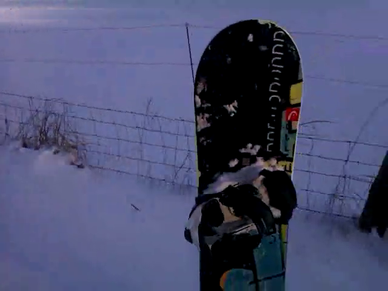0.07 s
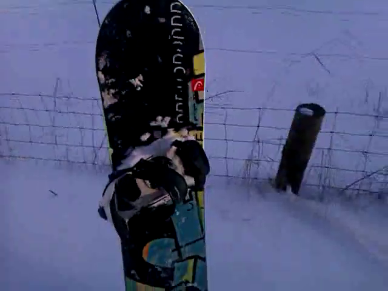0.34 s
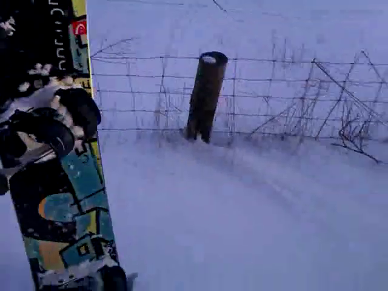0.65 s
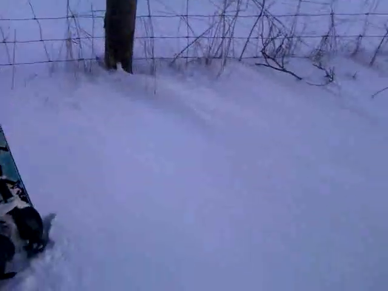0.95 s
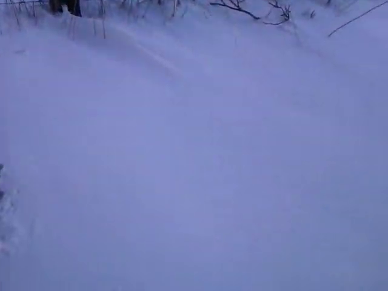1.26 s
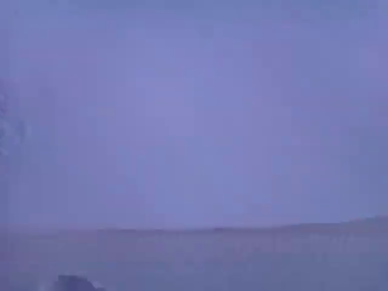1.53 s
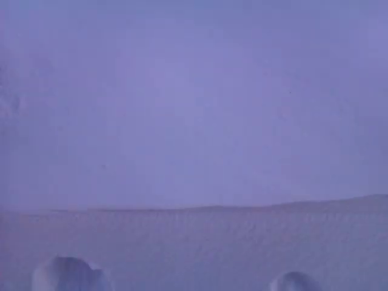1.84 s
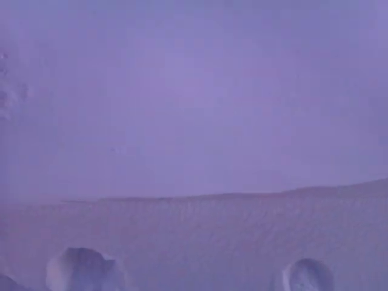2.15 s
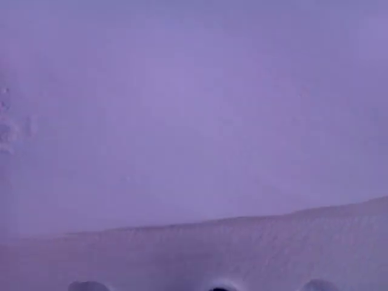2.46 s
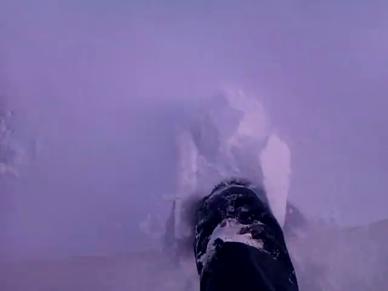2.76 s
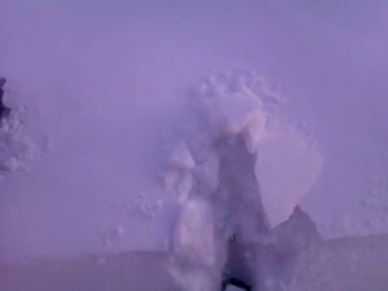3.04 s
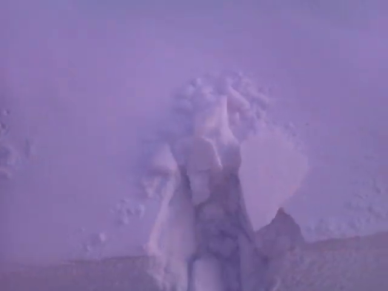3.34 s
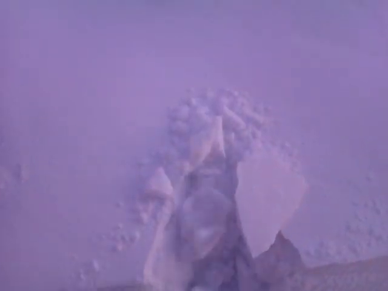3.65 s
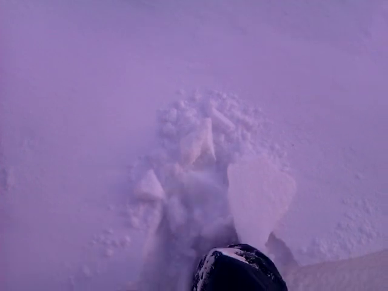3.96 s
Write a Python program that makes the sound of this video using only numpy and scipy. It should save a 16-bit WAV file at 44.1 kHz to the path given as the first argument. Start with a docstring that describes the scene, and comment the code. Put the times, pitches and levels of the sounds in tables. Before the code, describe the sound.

Soft, close crunching of a boot in snow starts about halfway, after rustling clothes, small gear ticks and low wind bumps outdoors. The wind then builds, and one fluttering gust briefly overloads the microphone.

```python
"""First you hear winter clothes rustling over a faint hiss, and low bumps of air on the microphone.
The fabric slides in many tiny slips, and clothing and gear give a few small ticks.
From about two seconds in, a boot pushes through soft snow close by: clumps crumble, powder swishes.
Near the end, one hard, fluttering gust briefly overloads the microphone."""
import sys
import numpy as np
from scipy import signal
from scipy.fft import rfft, irfft
from scipy.io import wavfile
from scipy.ndimage import uniform_filter1d

SR = 44100
rng = np.random.default_rng(int(sys.argv[2]) if len(sys.argv) > 2 else 0)


def materialize(psi):
    """Save the field psi as 16-bit PCM at rate SR to the path in sys.argv[1].

    A 1-D psi becomes a single channel; in a 2-D psi each row is a channel.
    """
    bounded = np.clip(np.atleast_2d(psi).T, -1, 1)
    quanta = np.round(bounded * 32767).astype(np.int16)
    wavfile.write(sys.argv[1], SR, quanta)


N = 176400
T = np.arange(N) / SR

# How loud the clothes rustle: time_s, level_db
RUSTLE_LEVEL = [(0, -61.5), (.33, -56.5), (.46, -50), (.72, -48), (.88, -52.5), (1.4, -57), (1.62, -52.5),
                (2.1, -59), (2.5, -52), (2.86, -54), (2.97, -48.5), (3.08, -48.5), (3.24, -43.5),
                (3.34, -49), (3.53, -48.5), (3.66, -50.5), (3.75, -45.5), (3.88, -42), (4, -44.5)]
# Tone of the sliding fabric: pitch_hz, level_db
CLOTH_TONE = [(200, -4.5), (900, -1.5), (1500, -2), (2000, 1), (2700, -6), (3500, -1.5), (4400, -8.5),
              (5700, 1.5), (6500, -0.5), (7800, -19), (10000, -33.5), (16000, -59.5)]
# Tone of the background hiss: pitch_hz, level_db
HISS_TONE = [(60, -17), (100, -4), (300, 0), (500, -2), (1000, -4), (2100, -8.5), (2800, -10), (4400, -14),
             (5900, -12), (8000, -15), (12000, -20.5), (16000, -20), (17500, -25)]
# How hard the air hits the microphone: time_s, level_db
WIND_LEVEL = [(0, -52), (.09, -55), (.16, -40.5), (.2, -36), (.27, -36.5), (.38, -39), (.47, -31.5),
              (.55, -39.5), (.6, -32), (.66, -39.5), (.71, -27), (.785, -28.5), (.87, -49), (1.0, -49),
              (1.15, -60), (1.37, -48.5), (1.58, -53), (1.72, -70), (2.12, -68), (2.4, -53), (2.72, -42.5),
              (2.86, -47.5), (3.04, -40.5), (3.08, -28.5), (3.13, -26), (3.17, -33.5), (3.21, -24.5),
              (3.26, -34), (3.325, -23.5), (3.36, -41.5), (3.44, -43), (3.48, -30.5), (3.54, -35.5),
              (3.58, -21.5), (3.68, -25), (3.78, -28), (3.86, -23), (3.92, -27.5), (4, -21)]
# How strong fast swirls of air are next to slow ones: time_s, balance_db
FAST_SWIRL_BALANCE = [(0, 5), (.25, -12), (.45, -0.5), (.6, -6.5), (.7, 3), (.8, 6), (.9, -11), (1.6, -27),
                      (2.8, -10.5), (3.1, 3.5), (3.3, 9), (3.45, 2.5), (3.75, -0.5), (4, -2)]
# Tones of the slow, the fast and the deepest swirls: pitch_hz, level_db
SLOW_SWIRL_TONE = [(20, -24), (45, 5), (80, 4.5), (130, -2), (220, -16.5), (400, -23.5), (900, -77)]
FAST_SWIRL_TONE = [(30, -30), (90, -0.5), (160, 5.5), (260, -4), (380, -11), (560, -23.5), (900, -30),
                   (2000, -108)]
DEEP_SWIRL_TONE = [(6, -11), (18, 12.5), (40, 14.5), (62, 13), (90, -19), (200, -67)]
# Single bumps of air: middle_s, peak_db, pitch_hz
AIR_BUMPS = [(0.115, -32.5, 118), (0.353, -31.5, 197), (0.591, -20, 93), (0.696, -18, 144),
             (.758, -19, 176), (.785, -13.5, 151), (1.338, -34.5, 79), (1.362, -35, 153),
             (1.787, -37.5, 228), (2.21, -37.5, 157), (2.995, -17, 120), (3.214, -18.5, 175),
             (3.237, -12, 177), (3.375, -26, 152), (3.424, -26, 350), (3.572, -20, 112), (3.864, -15, 200),
             (3.977, -14.5, 68.4)]
# Ticks of clothing and gear: start_s, peak_db, pitch_hz, fade_s
GEAR_TICKS = [(.703, -23, 5200, .0014), (1.61, -37, 3500, .0015), (1.785, -32, 2600, .0025),
              (2.139, -34, 1500, .0005), (2.506, -35, 1700, .001), (3.423, -26, 1100, .003),
              (3.915, -19, 2300, .0002)]
# Pushes of the boot through snow: start_s, length_s, level_db, powder_db (added to level_db)
BOOT_PUSHES = [(2.189, 0.058, -43, -21), (2.251, 0.24, -47, -11), (2.393, 0.071, -58, 9.5),
               (2.536, 0.11, -46, 0.5), (2.64, 0.096, -47.5, 4.5), (3.008, 0.027, -48.5, 4),
               (3.517, 0.047, -56, 5), (3.7, 0.073, -48, 3.5), (3.773, 0.092, -50, 3.5)]
# Tones of breaking clumps and of loose powder: pitch_hz, level_db
CRUNCH_TONE = [(100, -18), (300, 0.5), (800, -0.5), (2000, -1), (2700, -8.5), (3500, -3.5), (4300, -11),
               (5800, -2), (8000, -23.5), (16000, -26.5)]
POWDER_TONE = [(800, -64), (2500, -6.5), (3500, -8), (4300, -16), (5900, -2), (7300, -10.5), (9000, -14.5),
               (10500, -22.5), (16000, -26)]
# Blows that make up the hard gust: peak_s, level_db, rise_s, fall_s, pitch_hz, rasp_db (added to level_db)
GUST_BLOWS = [(3.600, -14, 0.0046, 0.0036, 250, -14), (3.6146, -3, 0.0083, 0.0064, 238, -7.5),
              (3.635, -13.5, 0.0036, 0.0055, 230, -7), (3.645, -14, 0.0015, 0.0036, 242, -8.5),
              (3.651, -16.5, 0.0012, 0.0031, 258, 1.5)]
# Tone of the gust's rough rasp: pitch_hz, level_db
RASP_TONE = [(100, -18), (330, -33), (470, 7.5), (700, 1), (970, -6.5), (1240, -14.5), (1510, -12.5),
             (1750, -27.5), (2400, -31.5), (3200, -50), (4000, -55), (8000, -91)]


def gain(db):
    """Turns decibels into a number to multiply by."""
    return 10 ** (np.asarray(db) / 20)


def normalise(x):
    """Scales x to an average strength (rms) of 1."""
    return x / np.sqrt(np.mean(x ** 2) + 1e-20)


def curve(points):
    """Joins (time_s, value) points with straight lines."""
    return np.interp(T, *np.transpose(points))


def with_tone(x, tone):
    """Shapes the lows and highs of x by a tone table, at strength 1."""
    hz, db = np.transpose(tone)
    freqs = np.fft.rfftfreq(len(x), 1 / SR)
    gains = gain(np.interp(np.log(freqs + 1), np.log(hz), db))
    return normalise(irfft(rfft(x) * gains, len(x)))


def drift(rate_hz):
    """A smooth random wobble, at strength 1."""
    freqs = np.fft.rfftfreq(N, 1 / SR)
    return normalise(irfft(rfft(rng.standard_normal(N)) * np.exp(-(freqs / rate_hz) ** 2), N))


def grains(per_s, spread_db):
    """Tiny random clicks, a few much louder than the rest."""
    size = gain(spread_db * np.minimum(rng.exponential(1, N), 5))
    return rng.standard_normal(N) * size * (rng.random(N) < per_s / SR)


def swirls(tone, steadiness):
    """The noise of swirling air; steadiness, from 0 to 1, evens out its loudness."""
    noise = with_tone(rng.standard_normal(N), tone)
    power = uniform_filter1d(uniform_filter1d(noise ** 2, size=2200), size=2200)
    return normalise(noise / (power + 1e-6) ** (steadiness / 2))


def clothes():
    """Fabric slides in many uneven little slips."""
    slips = with_tone(grains(per_s=12000, spread_db=1.33), CLOTH_TONE)
    return gain(curve(RUSTLE_LEVEL) + 0.93 * drift(rate_hz=28)) * slips


def hiss(level_db=-52):
    """A faint background hiss that wavers slightly."""
    return gain(level_db + 1.2 * drift(rate_hz=10)) * with_tone(rng.standard_normal(N), HISS_TONE)


def wind():
    """Slow and fast swirls of air brush the microphone, over a deep rumble."""
    wind_db, fast_gain = curve(WIND_LEVEL), gain(curve(FAST_SWIRL_BALANCE))
    slow = swirls(SLOW_SWIRL_TONE, steadiness=0.28)
    fast = swirls(FAST_SWIRL_TONE, steadiness=1.0)
    blend = (slow + fast_gain * fast) / np.sqrt(1 + fast_gain ** 2)
    rumble_db = -22 + 0.55 * wind_db  # rises and falls less than the wind does
    return gain(wind_db) * blend + gain(rumble_db) * swirls(DEEP_SWIRL_TONE, steadiness=0.17)


def air_bumps():
    """Each big swirl pulls once and pushes once on the microphone."""
    out = np.zeros(N)
    for middle_s, peak_db, pitch_hz in AIR_BUMPS:
        phase = 2 * np.pi * pitch_hz * (T - middle_s)
        out += gain(peak_db) * phase * np.exp((1 - phase ** 2) / 2)
    return out


def gear_ticks(grit=0.18, muffle_hz=7100):
    """Clothing and gear tick: a snap with a short gritty tail, muffled by cloth."""
    out = np.zeros(N)
    for start_s, peak_db, pitch_hz, fade_s in GEAR_TICKS:
        fade = (T >= start_s) * np.exp(-np.minimum(abs(T - start_s) / fade_s, 20))
        burst = grit * rng.standard_normal(N) * fade
        burst[round(start_s * SR)] = 1  # the snap
        band_hz = [pitch_hz * 0.36, pitch_hz * 1.38]
        tick = signal.lfilter(*signal.butter(2, band_hz, "band", fs=SR), burst)
        tick = signal.lfilter(*signal.butter(4, muffle_hz, fs=SR), tick)
        out += gain(peak_db) * tick / abs(tick).max()
    return out


def boot_in_snow(rise_s=0.019, fade_s=0.018):
    """Clumps of snow crystals break under the boot while loose powder sprays off."""
    crunch_power, powder_power = np.zeros((2, N))
    for start_s, length_s, level_db, powder_db in BOOT_PUSHES:
        rise = np.clip((T - start_s) / rise_s, 0, 1)
        fade = np.exp(-np.maximum(T - start_s - length_s + fade_s / 2, 0) / fade_s)
        crunch_power += (gain(level_db) * rise * fade) ** 2
        powder_power += (gain(level_db + powder_db) * rise * fade) ** 2
    clumps = gain(1.24 * drift(rate_hz=47))
    crunch = with_tone(grains(per_s=18000, spread_db=2.1), CRUNCH_TONE)
    powder = with_tone(grains(per_s=16000, spread_db=2.5), POWDER_TONE)
    return clumps * (np.sqrt(crunch_power) * crunch + np.sqrt(powder_power) * powder)


def hard_gust():
    """Air flutters hard against the microphone in a few quick, rough blows."""
    out = np.zeros(N)
    rasp, wobble = swirls(RASP_TONE, steadiness=0.9), drift(rate_hz=110)
    for peak_s, level_db, rise_s, fall_s, pitch_hz, rasp_db in GUST_BLOWS:
        cycles = np.cumsum(pitch_hz * (1 + 0.16 * wobble)) / SR
        flutter = np.sqrt(2) * np.sin(2 * np.pi * (cycles - np.interp(peak_s, T, cycles)))
        from_peak = np.maximum((peak_s - T) / rise_s, (T - peak_s) / fall_s)
        swell = np.exp(-np.minimum(from_peak ** 2, 20))
        out += gain(level_db) * swell * (flutter + gain(rasp_db) * rasp)
    return out


def scene():
    """Adds all the sounds into one channel."""
    return (clothes() + hiss() + wind() + air_bumps() + gear_ticks() + boot_in_snow() + hard_gust())[None]


def record(dry):
    """Overload flattens the tallest peaks, then the very highest pitches are cut."""
    excess = dry - np.clip(dry, -1, 1)
    flattened = dry - uniform_filter1d(excess, size=9)
    treble_cut = signal.firwin(511, cutoff=17200, window=("kaiser", 9), fs=SR)
    return signal.oaconvolve(flattened, treble_cut[None], "same")


dry = scene()
out = record(dry)
materialize(out)
```